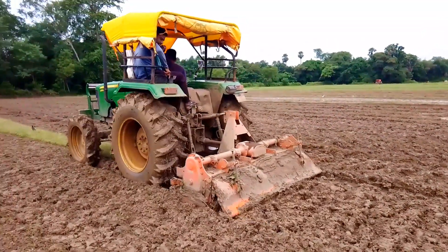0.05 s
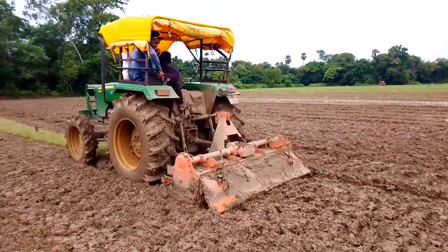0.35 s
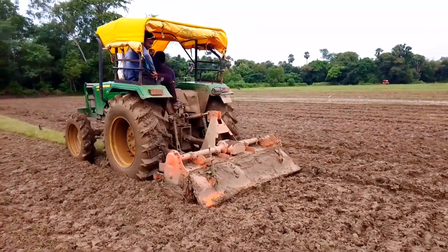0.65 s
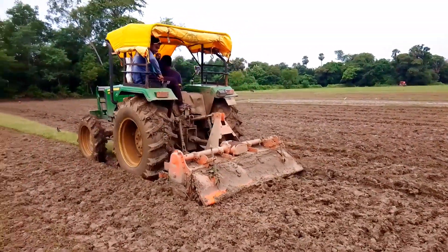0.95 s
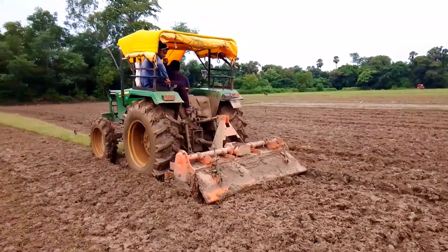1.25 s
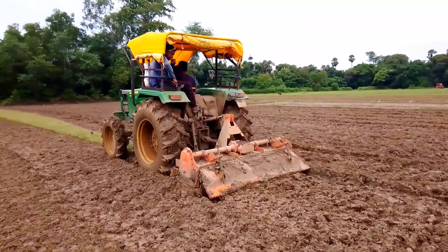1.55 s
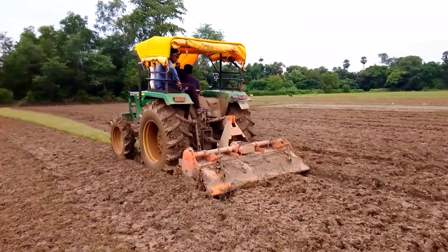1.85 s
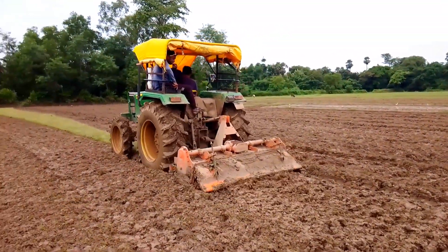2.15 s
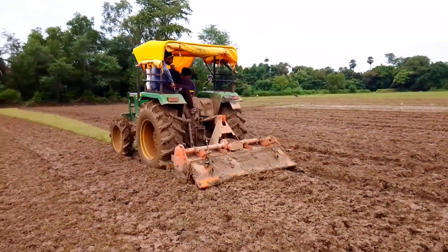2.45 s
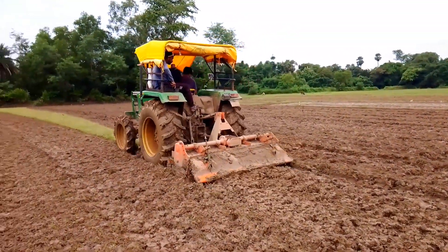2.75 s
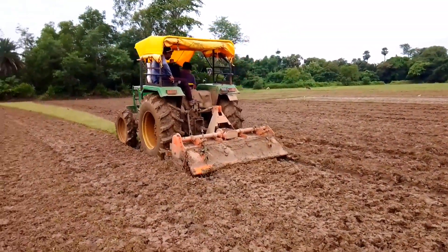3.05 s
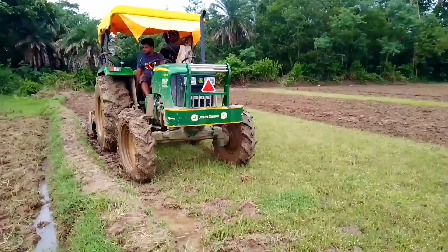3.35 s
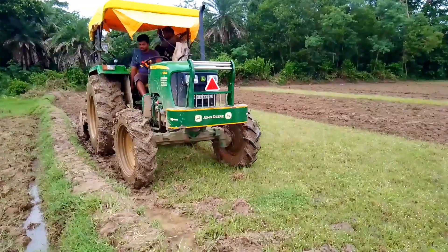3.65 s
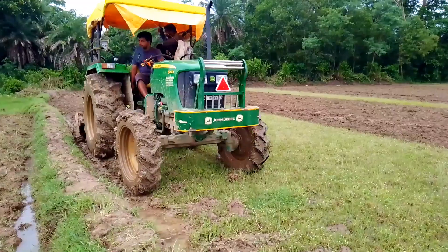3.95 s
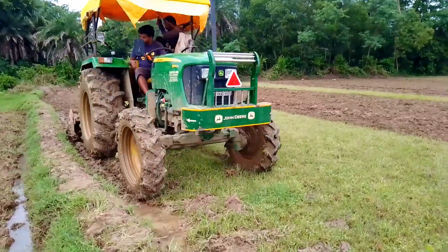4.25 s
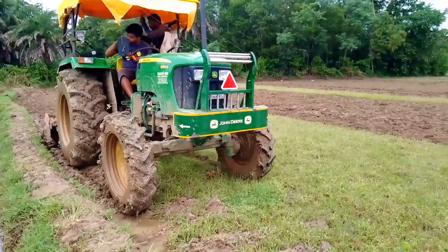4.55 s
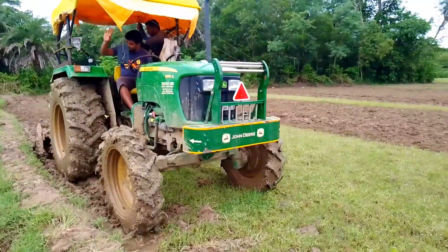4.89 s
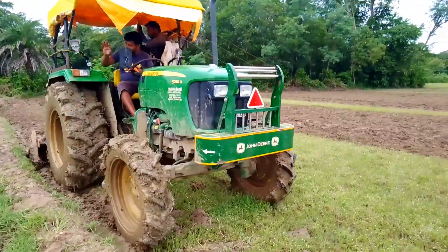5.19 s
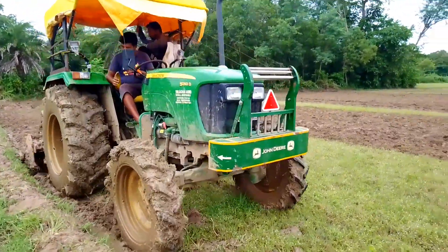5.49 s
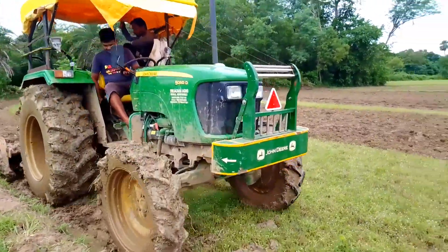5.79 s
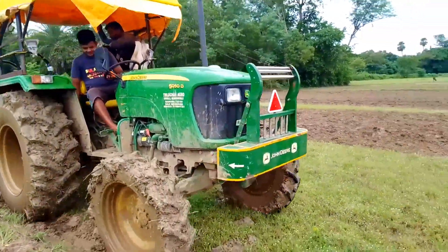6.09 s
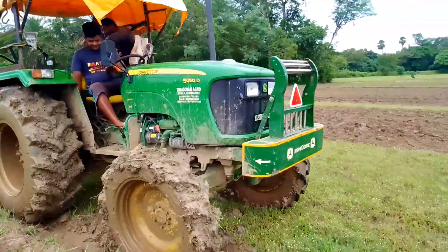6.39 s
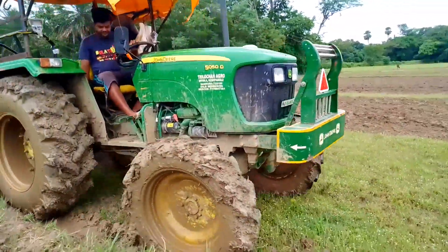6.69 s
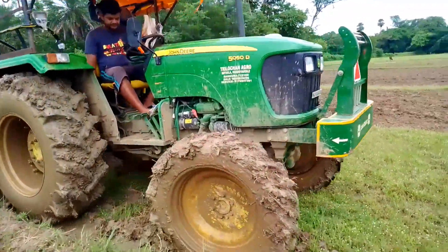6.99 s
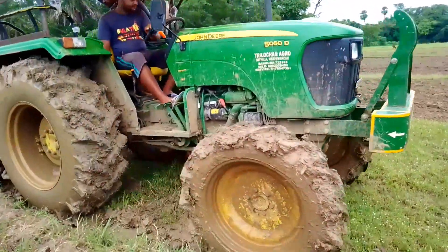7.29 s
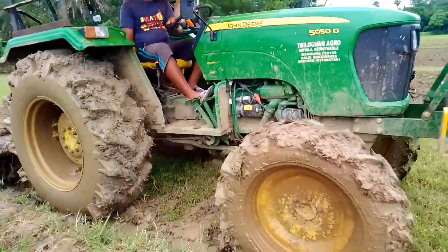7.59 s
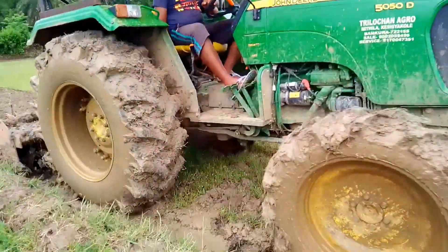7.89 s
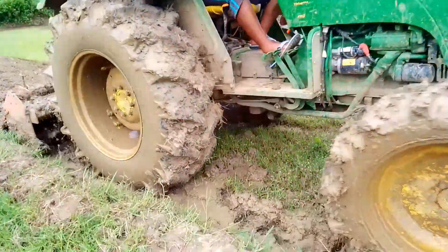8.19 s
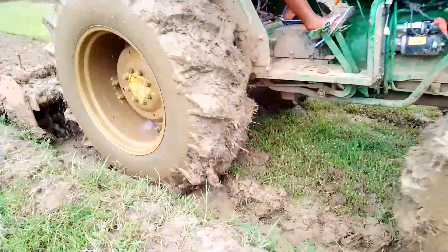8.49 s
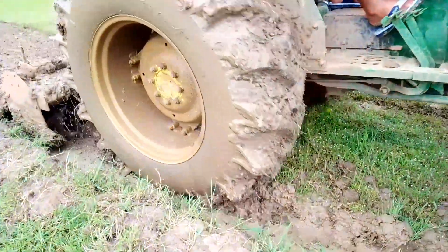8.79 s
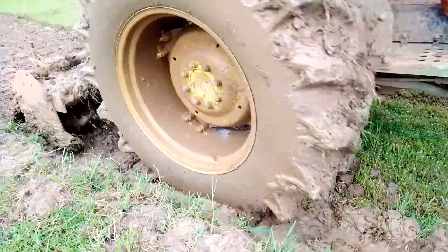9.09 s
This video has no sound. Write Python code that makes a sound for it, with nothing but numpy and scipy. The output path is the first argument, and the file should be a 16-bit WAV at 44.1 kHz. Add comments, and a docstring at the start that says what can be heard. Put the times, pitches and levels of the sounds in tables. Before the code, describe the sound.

A diesel tractor runs steadily under load in an open field, heard from behind as it pulls a tiller: a low, throbbing exhaust drone with soft clatter that dulls as it draws away. A bird gives quick runs of chirps during the first 1.2 seconds. The tiller squeaks faintly and thinly near 0.3, 0.7 and 2.7 seconds, and a stone ticks against it at 1.5. The engine speeds up slightly from 2.2 seconds, then the sound cuts to silence at 3.1. At 3.3 it fades quickly back in, now from the front, with hard diesel knock and metallic ticking over the throb. The drone grows from about 4.5 seconds as the tractor approaches. From about 6 seconds the ticking and knock soften while it passes close, the drone staying strong. Four short scrapes of wet mud come between 8 and 9.1 seconds.

```python
"""A wet field: a three-cylinder diesel tractor pulls a rotary tiller, heard from two spots in turn.
From behind it draws away and picks up speed, while the tiller squeaks and a bird chirps.
After a short silence it comes up from the front and passes close, throwing clods of mud.
Each firing gives an exhaust pulse and a burst of combustion knock that rings through block and panels;
the cylinders are unequal, so the engine throbs."""
import sys
import numpy as np
from scipy import signal
from scipy.fft import rfft, irfft, next_fast_len
from scipy.io import wavfile

SR = 44100
rng = np.random.default_rng(int(sys.argv[2]) if len(sys.argv) > 2 else 0)


def file_out(sig):
    """Save sig as 16-bit WAV at sys.argv[1]."""
    # one column per channel
    cols = np.atleast_2d(sig).T
    # limit, then scale
    lim = np.clip(cols, -1, 1)
    pcm = np.round(lim * 32767).astype(np.int16)
    wavfile.write(sys.argv[1], SR, pcm)


N = 403063
TIME = np.arange(N) / SR
FREQS = np.maximum(np.fft.rfftfreq(next_fast_len(N), 1 / SR), 1)

# knock of each cylinder, heard from the front: relative level/dB
FRONT_CYLINDERS = [-5, -1.6, 0.71]


def tractor_from_behind():
    """The tractor draws away: mostly exhaust, with soft knock and a spatter of soil."""
    # engine speed: t/s, firing rate/Hz
    revs = [(0.25, 38.42), (0.5, 38.87), (0.75, 38.86), (1.1, 38.56), (1.7, 38.72), (2.2, 39.0),
            (3.1, 41.13)]
    # exhaust and gear tones: multiple of the four-stroke cycle rate, relative level/dB
    orders = [(3, -27), (6, -20), (9, -18.5), (10, -50), (11, -32.5), (12, -21), (13, -49), (14, -29.5),
              (15, -35), (17, -52.5), (18, -53), (21, -40.5)]
    # exhaust pipe resonance: f/Hz, width/Hz
    pipes = [(170, 21)]
    # knock of each cylinder: relative level/dB
    cylinders = [-1.2, -6, 0.41]
    # broad EQ of the clatter: f/Hz, gain/dB
    colour = [(60, 1.5), (180, -1), (400, 0.5), (510, -7), (620, -1.5), (950, -8), (1100, -7.5),
              (1650, -10), (2700, -18.5), (3700, -15.5), (5200, -33), (7800, -34.5), (9200, -43),
              (13000, -55)]
    # a ground-reflection dip, then ringing panels and pipes: f/Hz, width/Hz, gain/dB
    rings = [(526, 46, -3.5), (890, 250, 6.5), (1423, 76, 7.5), (2390, 200, 6.5), (2940, 80, 2.5)]
    # faders for boom, drone, body, knock, hiss: starting level/dB, slope/(dB/s)
    # the treble fades fastest with distance; the drone grows as the throttle opens
    faders = [(-25.5, -0.6), (-22.5, 0.63), (-23.5, -1.25), (-29.5, -1.96), (-43.5, -1.8)]
    speed, = in_time(revs)
    firings = 2.376 + np.cumsum(speed) / SR
    boom_db, drone_db, body_db, knock_db, hiss_db = [db + slope * TIME for db, slope in faders]
    boom, drone = exhaust(firings, speed, orders, pipes, lag=0.0076, waver_db=0.67)
    thud = knocks(firings, cylinders, rise=.12, decay=.2, steady=.16, repeat=.3, uneven_db=1.5)
    knock = knocks(firings, cylinders, rise=.26, decay=.16, steady=.24, repeat=.04, uneven_db=5.5)
    spatter = from_db(-6) * soil(per_s=800, spread_db=1.5)
    engine = clatter(thud, knock, spatter, panel_eq(colour, rings), body_db, knock_db, hiss_db)
    return from_db(boom_db) * boom + from_db(drone_db) * drone + engine


def tractor_from_front():
    """The tractor comes up and passes close: hard diesel knock over a throbbing drone."""
    # engine speed: t/s, firing rate/Hz
    revs = [(3.9, 41.2), (5.1, 41.35), (5.8, 41.22), (6.5, 41.42), (7.7, 41.1), (8.65, 40.76),
            (9.14, 41.12)]
    # exhaust and gear tones: multiple of the four-stroke cycle rate, relative level/dB
    orders = [(3, -30.5), (6, -23.5), (8, -41), (9, -23.5), (10, -50.5), (11, -31.5), (12, -20.3),
              (13, -28.5), (14, -31), (15, -32.5), (17, -49), (18, -44), (21, -52), (24, -44), (48, -49),
              (50, -36.5), (53, -42)]
    # exhaust pipe resonance, then a ringing bonnet panel: f/Hz, width/Hz
    pipes = [(160, 45.5), (192, 4.5)]
    # broad EQ of the clatter, head-on and side-on: f/Hz, gain/dB
    grille_colour = [(50, -0.5), (190, 5), (460, -1), (640, 0.5), (790, -1.5), (920, -4.5), (1220, 2),
                     (1800, -6), (2600, -5), (4100, -5), (5000, -20), (6500, -27.5), (7900, -27.5),
                     (9500, -35), (13000, -49), (15600, -42)]
    flank_colour = [(50, -2), (190, 8.5), (480, -0.5), (620, 3.5), (850, -3), (1250, 0.5), (1800, -5.5),
                    (2400, -5), (3100, -2), (4200, -6), (5000, -18.5), (7900, -27.5), (9500, -31),
                    (13000, -47), (15600, -35)]
    # ringing panels and pipes, with a narrow gear whine near 2 kHz, head-on and side-on: f/Hz, width/Hz,
    # gain/dB
    grille_rings = [(709, 116, 6.1), (1970, 9.8, 6.9), (2227, 87, 6.3), (7720, 640, 5.1)]
    flank_rings = [(670, 94, 5.4), (2280, 140, 3.2), (7760, 1000, 8.1)]
    # the exhaust nears and has just gone by at the end: t/s, closeness/(0-1)
    approach = [(3.5, 0), (4.4, 0.16), (5.2, 0.63), (7.0, .75), (8.65, 0.97), (9.1, 0.9)]
    # faders for boom, drone, body, knock, hiss: far level/dB, close level/dB
    faders = [(-19.5, -23.5), (-22.0, -15.5), (-22, -21.0), (-25.1, -25.0), (-40.5, -41.5)]
    # the grille turns away and the flank comes round: start/s, end/s
    turn = [5.74, 7.9]
    speed, = in_time(revs)
    firings = .309 + np.cumsum(speed) / SR
    closeness, = in_time(approach)
    boom_db, drone_db, body_db, knock_db, hiss_db = [
        far + (close - far) * closeness for far, close in faders]
    knock_db -= 1.35 * np.maximum(TIME - 6.27, 0)   # the knock fades once the bonnet is going by
    boom, drone = exhaust(firings, speed, orders, pipes, lag=1.8, waver_db=.5)
    thud = knocks(firings, FRONT_CYLINDERS, rise=.099, decay=.41, steady=.41, repeat=.21, uneven_db=2.5)
    # knock and ticks beam forward through the grille; alongside they blur and dull
    alongside = np.interp(TIME, turn, [0, 1])
    knock = knocks(firings, FRONT_CYLINDERS, rise=.022, decay=.56, steady=.67 + .04 * alongside,
                   repeat=.21, uneven_db=2.5)
    ticks = injector_ticks(firings, lag=.11, scatter_s=.002, valve_db=-11, uneven_db=4)
    ticks_db = knock_db - 3.8 - 11 * alongside
    spatter = from_db(-7.5) * soil(per_s=610, spread_db=1)
    levels = body_db, knock_db, hiss_db
    grille = clatter(thud, knock, spatter, panel_eq(grille_colour, grille_rings), *levels)
    flank = clatter(thud, knock, spatter, panel_eq(flank_colour, flank_rings), *levels)
    engine = (1 - alongside) * grille + alongside * flank
    return from_db(boom_db) * boom + from_db(drone_db) * drone + engine + from_db(ticks_db) * ticks


def exhaust(firings, speed, orders, pipes, lag, waver_db):
    """Exhaust pulses as tones phase-shifted by the pipe: low boom and silencer drone; lag in firings."""
    boom, drone = np.zeros(N), np.zeros(N)
    cycle_phase = 2 * np.pi * ((firings - lag) / 3 % 1)
    for order, db in orders:
        hz = order * np.mean(speed) / 3
        pipe_phase = sum(2 * np.arctan(2 * (hz - centre) / width) for centre, width in pipes)
        # orders between the firing harmonics come from unequal cylinders and are less steady
        unsteady = 1 if order % 3 == 0 else 2
        tone = from_db(db + unsteady * waver_db * drift(7.7)) * np.cos(order * cycle_phase - pipe_phase)
        if hz < 100:
            boom += tone
        else:
            drone += tone
    return unit_rms(boom), unit_rms(drone)


def knocks(firings, cylinders, rise, decay, steady, repeat, uneven_db):
    """A noise burst at each firing over steady gear noise; rise and decay are in firing intervals."""
    number, since = np.floor(firings).astype(int), firings % 1
    strength = from_db(np.array(cylinders)[number % 3] + uneven_db * rng.uniform(-1.5, 1.5, 512)[number])
    burst = strength * (1 - np.exp(-since / rise)) * np.exp(-since / decay)
    # the same parts collide in every cycle, so a share of the rattle loops with the crank
    pattern = rng.standard_normal(3200)
    loop = unit_rms(np.interp(firings / 3 % 1 * len(pattern), np.arange(len(pattern)), pattern))
    rattle = np.sqrt(repeat) * loop + np.sqrt(1 - repeat) * rng.standard_normal(N)
    return rattle * np.sqrt(burst ** 2 + steady ** 2)


def clatter(thud, knock, spatter, eq, body_db, knock_db, hiss_db):
    """The bursts sound through block and panels: hollow body, hard knock, and hiss with flying soil."""
    thud, knock = unit_rms(thud), unit_rms(knock)
    body = unit_rms(filtered(thud, eq * band(58, 1100)) + filtered(knock, eq * band(1100, 1800)))
    hard = unit_rms(filtered(knock, eq * band(1800, 5500)))
    hiss = unit_rms(filtered(knock + spatter, eq * band(5500, 17000)))
    return from_db(body_db) * body + from_db(knock_db) * hard + from_db(hiss_db) * hiss


def panel_eq(colour, rings):
    """The tone of block and panels: a broad curve with narrow peaks or dips on it."""
    hz, db = np.transpose(colour)
    rings_db = sum(height / (1 + (2 * (FREQS - centre) / width) ** 2) for centre, width, height in rings)
    return from_db(np.interp(np.log(FREQS), np.log(hz), db) + rings_db)


def injector_ticks(firings, lag, scatter_s, valve_db, uneven_db):
    """Each injection, and a valve seating half a firing later, snaps against steel and sets it ringing."""
    # modes of the steel around the injectors: f/Hz, relative level/dB, t60/s
    modes = [(3000, -10, .018), (3480, -2, .016), (3740, -2, .016), (3900, 0, .016), (4060, -2, .016),
             (4280, -1, .018), (4480, -3, .014)]
    number = np.floor(2 * (firings - lag)).astype(int)
    onsets = np.flatnonzero(np.diff(number)) + 1
    blows = number[onsets]
    blow_db = np.array(FRONT_CYLINDERS)[blows // 2 % 3] + valve_db * (blows % 2)
    ringing = np.zeros(N)
    for hz, db, t60 in modes:
        force, polarity, timing = rng.uniform(-1, 1, (1024, 3))[blows].T
        # the needle bounces, so each mode is struck within a few milliseconds of the others
        struck = np.clip(onsets + (timing * scatter_s * SR).astype(int), 0, N - 1)
        clicks = np.full(N, 1e-18)
        clicks[struck] = from_db(db + blow_db + uneven_db * force) * np.sign(polarity)
        radius, angle = from_db(-60 / (t60 * SR)), 2 * np.pi * hz / SR
        ringing += signal.lfilter([0, np.sin(angle)], [1, -2 * radius * np.cos(angle), radius ** 2], clicks)
    return unit_rms(filtered(ringing, band(1500, 8500)))


def soil(per_s, spread_db):
    """Wet clods tear and spatter: dense clicks of very unequal size."""
    sizes = from_db(spread_db * np.minimum(rng.exponential(1, N), 4)) * rng.standard_normal(N)
    return unit_rms(sizes * (rng.random(N) < per_s / SR))


def clods():
    """Lumps of mud scrape past the tines as the tiller comes near."""
    # scrapes: centre t/s, length/s, level/dB
    scrapes = [(8.035, .04, -25), (8.26, .05, -27), (8.62, .045, -27), (9.064, 0.056, -25)]
    envelope = sum(from_db(db) / (1 + (2 * (TIME - t) / length) ** 4) for t, length, db in scrapes)
    return envelope * unit_rms(filtered(soil(per_s=2500, spread_db=1), band(1000, 4000)))


def stone_tick(decay_s):
    """A stone hits the tiller: a bright tick that dies within milliseconds."""
    # hit: t/s, level/dB
    hits = [(1.479, -25)]
    envelope = sum(from_db(db) * (TIME > t) * np.exp(-np.abs(TIME - t) / decay_s) for t, db in hits)
    return envelope * unit_rms(filtered(rng.standard_normal(N), band(3800, 7300) / FREQS))


def tiller_squeaks():
    """The tiller gives thin, high squeaks of almost steady pitch."""
    # squeaks: centre t/s, f/Hz, length/s, level/dB
    squeaks = [(.29, 8650, 0.12, -55), (.69, 8700, 0.097, -57), (2.725, 8755, 0.069, -43)]
    return whistles(squeaks, arch=.001, wobble=.002)


def bird(chirp_s):
    """A bird whistles quick runs of like chirps, each arching in pitch."""
    # phrases: t/s, number of chirps, spacing/s, top f/Hz, level/dB
    phrases = [(.092, 6, .0445, 2990, -31.5), (.443, 6, .031, 3590, -28.5), (.909, 4, .047, 2900, -25),
               (1.185, 1, .04, 3480, -33)]
    chirps = [(t + k * spacing, hz, chirp_s, db)
              for t, count, spacing, hz, db in phrases for k in range(round(count))]
    return whistles(chirps, arch=.14, wobble=.014)


def whistles(notes, arch, wobble):
    """Short near-sines whose pitch rises and falls back by the share `arch`."""
    out, waver = np.zeros(N), drift(320)
    for t, hz, length, db in notes:
        at = np.flatnonzero(np.abs(TIME - t) < length / 2)
        place = 2 * (TIME[at] - t) / length   # -1 to 1 across the note
        pitch = hz * (1 - arch * place ** 2 + wobble * waver[at])
        out[at] += from_db(db) * np.sqrt(1 - place ** 2) * np.sin(2 * np.pi * np.cumsum(pitch) / SR)
    return out


def from_db(db):
    """Decibels to gain."""
    return 10 ** (np.asarray(db) / 20)


def unit_rms(x):
    """Scale to unit power."""
    return x / np.sqrt(np.mean(x ** 2) + 1e-20)


def in_time(rows):
    """Breakpoints to one automation curve per value column."""
    times, *columns = np.transpose(rows)
    return [np.interp(TIME, times, column) for column in columns]


def drift(rate_hz):
    """Random modulation of unit power."""
    return unit_rms(np.interp(TIME * rate_hz, np.arange(2000), rng.standard_normal(2000)))


def filtered(x, gain):
    """Apply an EQ curve given at FREQS."""
    size = next_fast_len(N)
    return irfft(rfft(x, size) * gain, size)[:N]


def band(low_hz, high_hz):
    """EQ curve of a steep band-pass."""
    return ((1 + (low_hz / FREQS) ** 16) * (1 + (FREQS / high_hz) ** 16)) ** -.5


def scene():
    """Behind the tractor, a short silence, then a fade-in in front of it."""
    cut_s, resume_s, fade_s = 3.098, 3.317, .21
    behind = tractor_from_behind() + bird(chirp_s=.027) + tiller_squeaks() + stone_tick(decay_s=.0056)
    front = tractor_from_front() + clods()
    fade_in = np.interp(TIME, [resume_s, resume_s + fade_s], [.16, 1], left=0)
    return (behind * (TIME < cut_s) + front * fade_in)[None]


def record(dry):
    """A soft clip rounds the peaks and a steep low-pass cuts the top."""
    ceiling, stopband_hz = .8, 16700
    rounded = dry / (1 + np.abs(dry / ceiling) ** 6) ** (1 / 6)
    return signal.sosfilt(signal.cheby2(16, 70, stopband_hz, fs=SR, output="sos"), rounded)


dry = scene()
out = record(dry)
file_out(out)
```